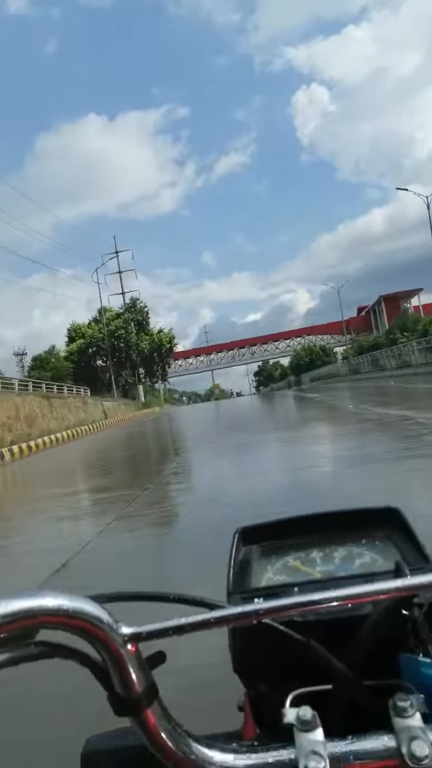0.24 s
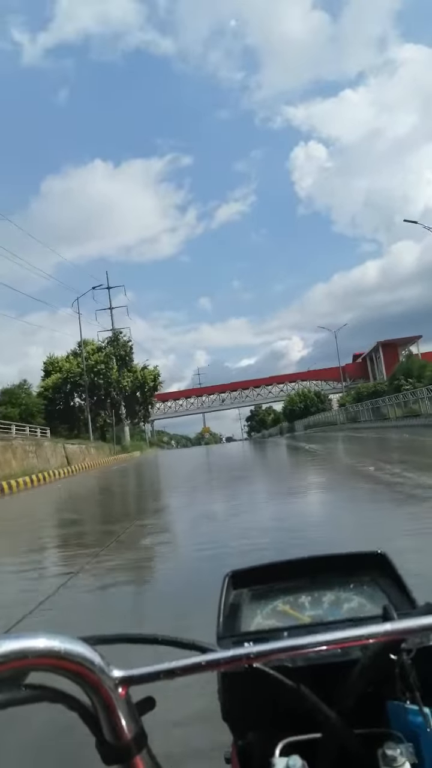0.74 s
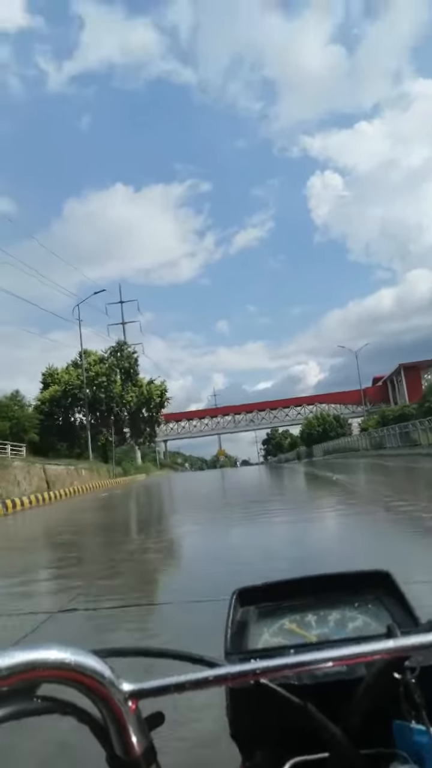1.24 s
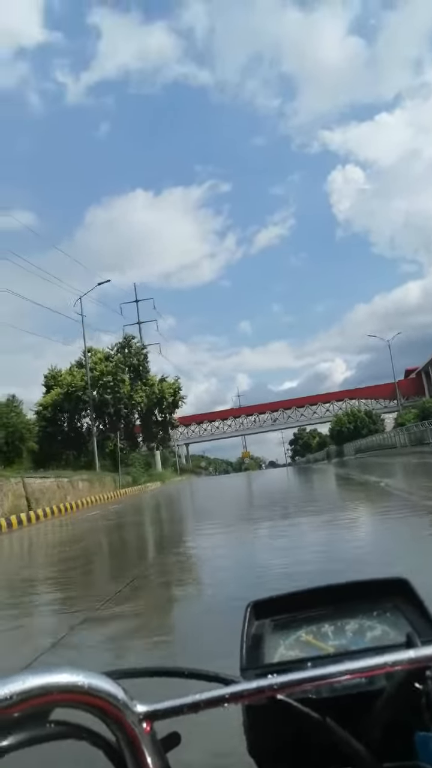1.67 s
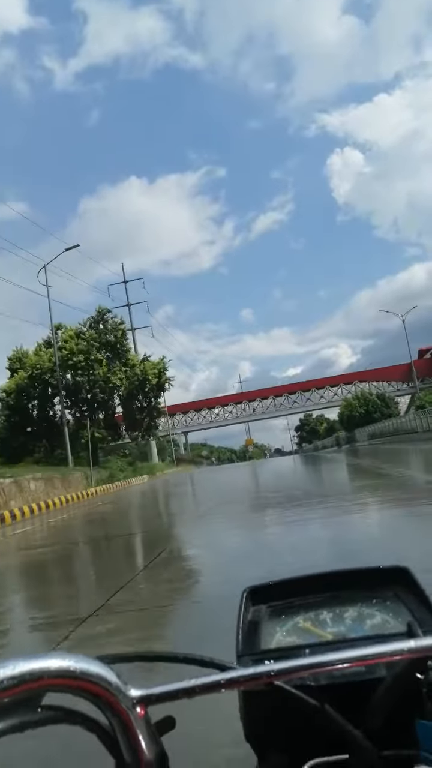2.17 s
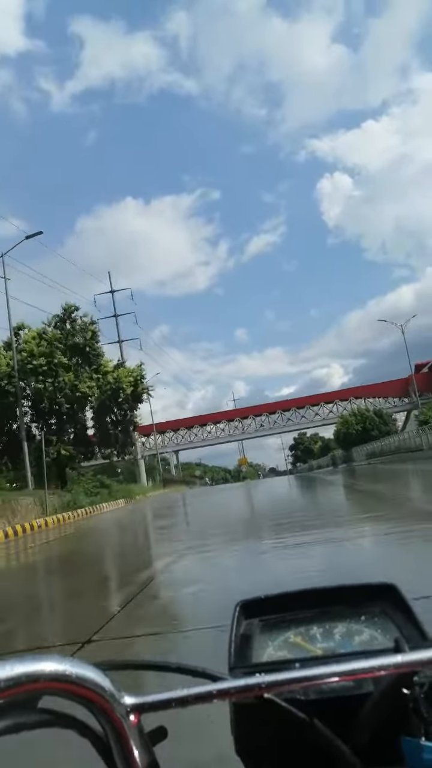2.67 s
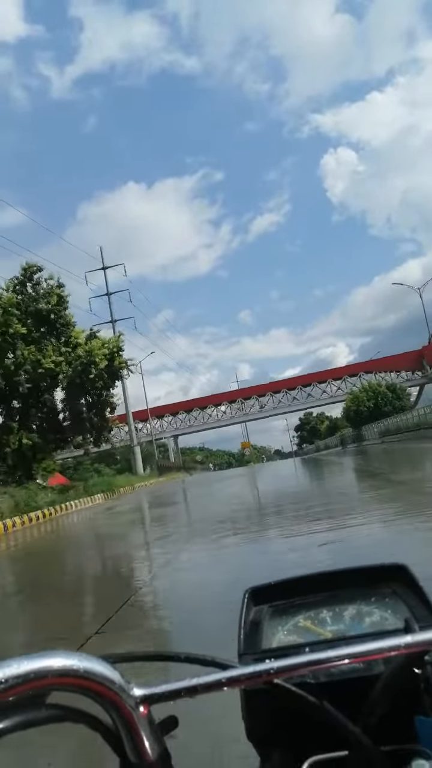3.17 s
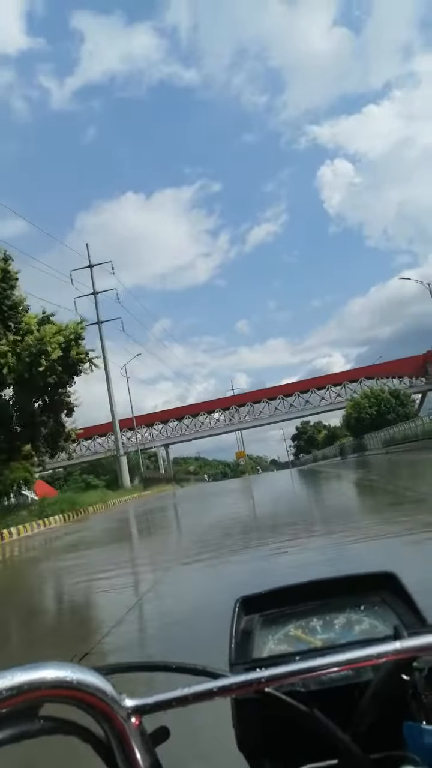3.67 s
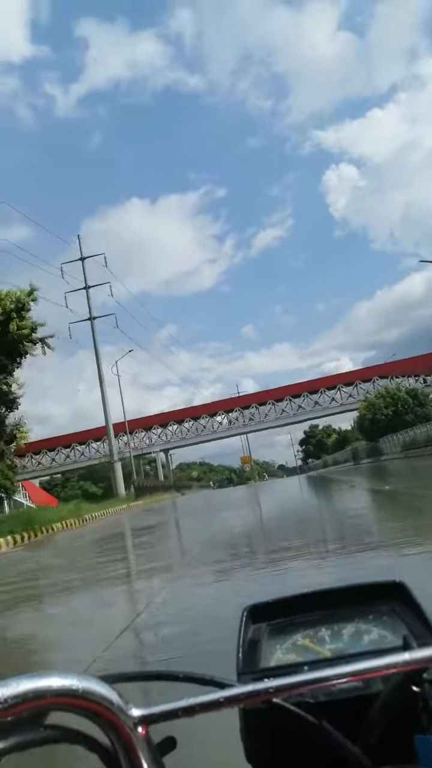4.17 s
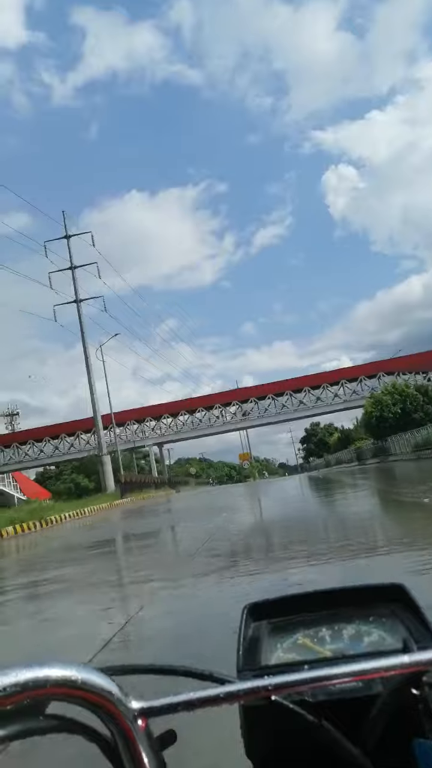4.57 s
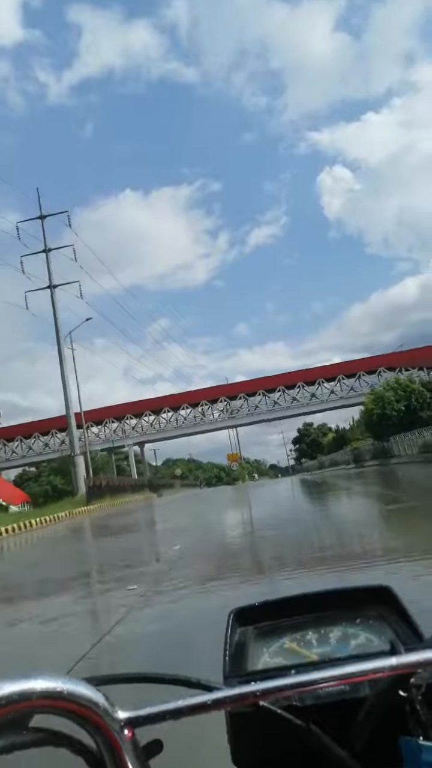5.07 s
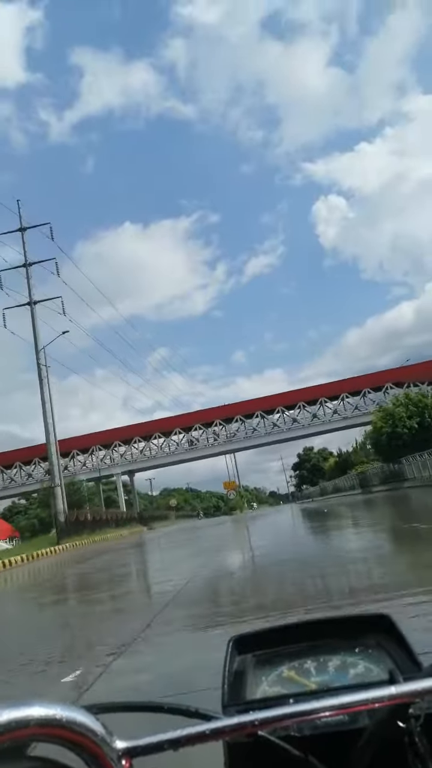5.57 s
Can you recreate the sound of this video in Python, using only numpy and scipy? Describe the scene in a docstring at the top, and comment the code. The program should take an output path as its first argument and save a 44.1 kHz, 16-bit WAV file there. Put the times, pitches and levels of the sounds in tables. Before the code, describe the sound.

Wind strikes the microphone in lumpy low bursts and sharp slaps while a small motorcycle engine putters quickly underneath, its pitch creeping up very slightly. Wet tyres add a continuous soft fizz and low roar, with a few tiny water ticks around one second. A calmer stretch near two seconds exposes the engine before heavier gusts follow. Outdoors, close mono microphone on the bike, its peaks held down automatically.

```python
"""A small single-cylinder engine drones and beats under the rider as a motorcycle cruises, very slowly speeding up.
The mono microphone is at the rider's seat: pulses shake pipe, case and valve gear over drone and gear whine.
The tyres roar low and hiss through the water film (shaped noise), and a few nearby drops tick (short sines).
Gusts on a breeze buffet the microphone (lumpy noise), and the sharpest eddies slap it (single swings).
The recorder eases the loud passages, limits the peaks and cuts the top of the band."""
import sys
import numpy as np
from scipy import signal
from scipy.fft import rfft, irfft, next_fast_len
from scipy.io import wavfile
from scipy.ndimage import uniform_filter1d, minimum_filter1d, map_coordinates

SR = 44100
rng = np.random.default_rng(int(sys.argv[2]) if len(sys.argv) > 2 else 0)


def int16_out(signal):
    """Quantize to a 16-bit WAV file."""
    q = np.round(np.clip(np.atleast_2d(signal).T, -1, 1) * 32767)
    wavfile.write(sys.argv[1], SR, q.astype(np.int16))


N = 256662  # length in samples

# All levels are ahead of the recorder; spectrum levels are relative, as each spectrum is scaled to rms 1.
# engine speed: [t/s, firing rate/Hz]
FIRING_RATE = [(0, 31.2), (.8, 31.25), (1.3, 31.35), (2.6, 31.38), (3.5, 31.48), (4.4, 31.62), (4.8, 31.8),
               (5.3, 32.05), (5.82, 32.15)]
# exhaust drone: [multiple of the firing rate, rms level/dB]
EXHAUST_DRONE = [(1, -59), (2, -37.5), (4, -44), (5, -40.5), (6, -50), (7, -52)]
# gear whine: [t/s, rms level/dB]
GEAR_WHINE = [(0, -54), (.7, -53.5), (2.6, -52), (3.4, -51), (4.4, -60), (5.82, -58.5)]
# outline of the pipe and air box: [f/Hz, relative level/dB]
PIPE_OUTLINE = [(150, -43.5), (250, -11), (282, -0.5), (315, 4), (346, 1), (378, -2), (410, 1.5), (442, 6),
                (472, -5.5), (503, -6), (535, -15.5), (565, -14), (597, -15.5), (680, -21.5), (790, -22.5),
                (1060, -23), (1300, -41)]
# crankcase resonances: [f/Hz, width of each of two equal stages/Hz, relative level/dB]
CASE_MODES = [(884.5, 110, -4), (824, 82, 0), (1024, 110, -4.5)]
# cylinder head resonances: [f/Hz, width of each of two equal stages/Hz, relative level/dB]
HEAD_MODES = [(1723, 310, -1.5), (1908, 120, 0), (2070, 180, -4.5), (2580, 460, -7.5), (3025, 130, 4.5),
              (3235, 130, 3.5)]
# valve gear: [t/s, level before a fixed 8 dB cut/dB]
VALVE_CLATTER = [(0, -45.5), (.17, -49.5), (.7, -45.5), (1.8, -45.5), (4.6, -46), (5.82, -49)]
# tyre hiss spectrum: [f/Hz, relative level per Hz/dB]
SPRAY_SPECTRUM = [(710, -32), (1200, -7), (1410, -19.5), (1500, -4.5), (1700, 0.5), (1900, -1),
                  (2240, -4.5), (2840, -3), (3130, -4.5), (3800, -10), (4430, -9), (5240, 2), (5930, 0.5),
                  (7130, -12), (7520, -20), (9780, -53.5)]
# hiss of the water film: [t/s, level before a random wobble/dB]
SPRAY_LEVEL = [(0, -50), (.4, -49), (.75, -47.5), (1.4, -48), (1.95, -47), (2.6, -48.5), (5.05, -48.5),
               (5.82, -50)]
# rolling noise spectrum: [f/Hz, relative level per Hz/dB]
ROAD_SPECTRUM = [(20, -16.5), (60, -9.5), (200, -4.5), (450, -4), (650, -12.5), (950, -10), (1350, -23.5),
                 (2500, -27.5), (5000, -57)]
# airflow between the gusts: [t/s, level before a random wobble/dB]
BREEZE = [(0, -35.5), (.65, -36.5), (1.1, -41), (1.35, -34.5), (1.9, -36), (2.8, -34), (3.3, -30.5),
          (4.15, -34.5), (4.45, -37.5), (5.0, -34.5), (5.82, -33)]
# gusts: [t at full strength/s, hold/s, buffet level/dB, flutter level/dB]
GUSTS = [(0.158, 0.019, -29.5, -35), (0.466, 0.033, -41, -38), (0.539, 0.031, -33, -42.5),
         (1.225, 0.075, -33.5, -38.5), (1.42, 0.098, -31.5, -48), (1.57, 0.051, -29, -42),
         (3.081, 0.023, -26, -33.5), (3.123, 0.1, -27.5, -42), (3.274, 0.034, -22.5, -33),
         (3.364, 0.18, -29, -42), (3.57, 0.022, -21.5, -32), (3.768, 0.1, -27, -50),
         (4.117, 0.24, -27.5, -40), (4.24, 0.055, -22.5, -30.5), (4.4, 0.026, -26.5, -35.5),
         (4.628, 0.024, -28.5, -33.5), (4.712, 0.3, -33, -42), (5.209, 0.048, -24, -45),
         (5.409, 0.024, -23.5, -32), (5.525, .027, -27.5, -35), (5.603, 0.11, -26, -47),
         (5.77, 0.02, -24, -37.5)]
# large eddies: [f/Hz, relative level per Hz/dB]
BUFFET_SPECTRUM = [(8, -30), (22, 0.5), (40, 3.5), (90, 1), (170, -2), (260, -4.5), (380, -13),
                   (550, -17.5), (1000, -55.5)]
# small eddies: [f/Hz, relative level per Hz/dB]
FLUTTER_SPECTRUM = [(100, -17), (250, -0.5), (420, 2.5), (620, -2.5), (850, -5.5), (1100, -19), (1400, -28),
                    (1900, -39), (3000, -63.5)]
# the smallest eddies: [f/Hz, relative level per Hz/dB]
TEARING_SPECTRUM = [(300, -23), (650, -1.5), (950, 0), (1300, -16), (1650, -18), (2400, -51.5)]
# the hardest eddies, large ones thump and small ones slap: [t/s, level of the swing before muffling/dB, f/Hz]
EDDY_SLAPS = [(.106, -14, 330), (0.115, -4.5, 190), (.149, -3, 450), (.157, -7.5, 520), (.159, -8, 168),
              (.172, -11, 290), (0.209, -8.5, 523), (.327, -8, 286), (.459, -19.5, 744), (0.49, -19, 260),
              (0.492, -24, 380), (.573, -16, 290), (1.232, -16, 82), (1.298, -18, 180), (1.476, -22, 537),
              (1.503, -17, 480), (1.508, -12, 365), (1.582, -24, 264), (1.585, -19.5, 780),
              (1.638, -19, 430), (1.724, -17, 127), (2.2, -12, 245), (2.488, -15, 202), (2.549, -9.5, 305),
              (2.974, -21, 520), (2.979, -9.5, 350), (3.017, -17, 380), (3.042, -16, 500),
              (3.085, -23.5, 190), (3.091, -23, 300), (3.104, -14.5, 200), (3.127, -12, 115),
              (3.149, -17, 183), (3.19, -11, 160), (3.23, -13, 105), (3.264, -16, 230), (3.286, -10.5, 171),
              (3.296, -12, 136), (3.316, -14.5, 170), (3.567, -16.5, 660), (3.578, -12.5, 290),
              (3.581, -20, 700), (3.614, -15, 140), (3.619, -17.5, 780), (3.845, -10, 280),
              (3.887, -12, 374), (4.129, -13.5, 85), (4.138, -15, 200), (4.183, -10.5, 272),
              (4.223, -14.5, 470), (4.233, -12.5, 139), (4.243, -11.5, 520), (4.261, -5, 627),
              (4.266, -7, 300), (4.27, -11.5, 127), (4.289, -11, 600), (4.293, -8, 700), (4.319, -1, 210),
              (4.325, -10.5, 524), (4.394, -14, 640), (4.409, -19, 560), (4.42, -4.5, 414),
              (4.591, -15.5, 140), (4.606, -9, 546), (4.632, -11.5, 233), (4.725, -16, 475),
              (5.079, -15.5, 130), (5.115, -18.5, 400), (5.199, -13, 135), (5.221, -15, 800),
              (5.23, -21, 720), (5.248, -12.5, 92.6), (5.426, -9.5, 258), (5.442, -18, 680),
              (5.521, -12, 293), (5.549, -13, 260), (5.583, -13.5, 567), (5.63, -19, 190),
              (5.658, -11.5, 220), (5.777, -6.5, 282), (5.813, -9.5, 395)]
# water drops: [t/s, peak level/dB, f/Hz, 60 dB decay time/s]
WATER_DROPS = [(.389, -28, 3600, .0008), (.795, -27, 5530, .0015), (1.0415, -19.5, 5800, 0.0029),
               (1.069, -25, 4200, 0.00067), (1.149, -27, 3500, .0008), (1.171, -24, 2840, 0.00098),
               (5.494, -28, 5400, 0.0016)]

BREEZE_FLUTTER_DB = -11.5  # small eddies of the breeze, against its large ones
GUST_ATTACK_S, GUST_RELEASE_S = 0.011, 0.02
TEARING_DB, TEARING_AT_DB = -39.5, -29  # tearing level at this flutter level; it grows with the flutter squared
TOP_HZ = 7500  # the recorder's band limit


def amp(db):
    """Decibels to gain."""
    return 10 ** (np.asarray(db) / 20)


def unit(x):
    """Scale to rms 1."""
    return x / np.sqrt(np.mean(x ** 2) + 1e-20)


def curves(rows):
    """One value per sample for each column after the time."""
    knots_s, *columns = np.transpose(rows)
    t = np.arange(N) / SR
    return [np.interp(t, knots_s, column) for column in columns]


def wobble(rate):
    """A smooth random curve, rate knots a second."""
    knots = rng.standard_normal(int(N * rate / SR) + 4)
    return map_coordinates(knots, [np.arange(N) * rate / SR])


def noise():
    """White noise."""
    return rng.standard_normal(N)


def filtered(x, response):
    """x times a complex response of frequency, with room for the tail."""
    size = 2 * next_fast_len(N // 2 + 8192)
    spectrum = rfft(x, size) * response(np.fft.rfftfreq(size, 1 / SR))
    return irfft(spectrum, size)[:N]


def coloured(x, points):
    """x through a causal filter with the given (Hz, dB) outline, at rms 1."""
    f, db = np.transpose(points)

    def response(hz):
        outline_db = np.interp(np.log(hz + 1), np.log(f), db)
        # folding the cepstrum onto positive times gives minimum phase
        cepstrum = irfft(np.log(amp(outline_db)))
        half = len(cepstrum) // 2
        return np.exp(rfft(2 * cepstrum[:half], len(cepstrum)))

    return unit(filtered(x, response))


def resonant(x, modes):
    """x through (Hz, width, dB) resonances, squared for steep skirts, at rms 1."""
    def response(f):
        total = 0
        for centre, width, db in modes:
            damping = 1j * f * width
            total = total + amp(db) * (damping / (centre * centre - f * f + damping)) ** 2
        return total

    return unit(filtered(x, response))


def tone(cycle, order, wander_db):
    """A slightly unsteady cosine at a multiple of the cycle rate, rms 1 before the wander."""
    return amp(wander_db * wobble(5.7)) * np.sqrt(2) * np.cos(2 * np.pi * round(order) * cycle)


def strokes(cycle, lag, scatter_db, jitter):
    """One impulse per engine cycle, lag cycles after the firing; jitter in seconds."""
    at = np.flatnonzero(np.diff(np.floor(cycle - lag)))
    chance = rng.standard_normal((len(at), 2))
    at = np.clip(np.round(at + jitter * SR * chance[:, 0]).astype(int), 0, N - 1)
    return np.bincount(at, amp(scatter_db * chance[:, 1]), N)


def engine(clatter_db):
    """Four gas pulses per cycle, a knock in the case and valve clatter, over the exhaust drone and a gear whine."""
    rate, = curves(FIRING_RATE)
    whine_db, = curves(GEAR_WHINE)
    cycle = np.cumsum(rate) / SR - .11
    drone = sum(amp(db) * tone(cycle, k, wander_db=0.9) for k, db in EXHAUST_DRONE)
    unsteady_cycle = cycle + 0.0022 * wobble(45)
    whine = amp(whine_db) * tone(unsteady_cycle, order=29, wander_db=1.5)

    # the exhaust blows, the intake sucks, the pipe puffs back twice: (share of a cycle, size)
    pulses = [(0, 1), (.3, -.55), (.6, .3), (.75, .2)]
    gas = sum(size * strokes(cycle, lag, scatter_db=1.2, jitter=.00004) for lag, size in pulses)
    bark = amp(-38.0) * coloured(gas, PIPE_OUTLINE)
    knock = strokes(cycle, .69, scatter_db=3.5, jitter=.00009)
    case = amp(-56.5) * resonant(knock, CASE_MODES)

    # the valve rattle swells twice per cycle, and one valve seats with a tick
    spells = amp(2 * np.cos(4 * np.pi * (cycle - .75)) + 3.1 * wobble(70))
    rattle = unit(spells * noise())
    seating = unit(strokes(cycle, .75, scatter_db=1.5, jitter=.00007))
    valves = amp(clatter_db - 8.0) * resonant(rattle + 0.71 * seating, HEAD_MODES)
    return drone + bark + case + whine + valves


def tyres(spray_db):
    """The tyres roll with a low roar and tear the water film into a fizz of droplets."""
    droplets = (rng.random(N) < 900 / SR) * noise()  # about 900 a second
    fizz = coloured(noise() + 0.66 * unit(droplets), SPRAY_SPECTRUM)
    hiss = amp(spray_db + 0.88 * wobble(28)) * fizz
    roar = amp(-44.0) * coloured(noise(), ROAD_SPECTRUM)
    return hiss + roar


def gust(start, hold):
    """A gust rises quickly to full strength at start, holds and dies away."""
    t = np.arange(N) / SR - start
    return np.interp(t, [-GUST_ATTACK_S, 0, hold, hold + GUST_RELEASE_S], [0, 1, 1, 0])


def turbulence(spectrum, lump_db, lump_rate):
    """Pressure noise that comes in brief lumps, at a steady mean strength."""
    x = coloured(noise() * amp(lump_db * wobble(lump_rate)), spectrum)
    mean_power = np.abs(uniform_filter1d(x ** 2, size=2400))  # over 54 ms
    return x / np.sqrt(mean_power + 1e-6)


def wind():
    """Gusts add their power to a restless breeze: large eddies rumble, small ones flutter, hard gusts tear."""
    breeze_db, = curves(BREEZE)
    breeze = amp(breeze_db + 1.5 * wobble(12))
    large_power = breeze ** 2
    small_power = (amp(BREEZE_FLUTTER_DB) * breeze) ** 2
    for start, hold, buffet_db, flutter_db in GUSTS:
        shape = gust(start, hold)
        large_power = large_power + (amp(buffet_db) * shape) ** 2
        small_power = small_power + (amp(flutter_db) * shape) ** 2
    buffet = np.sqrt(large_power) * turbulence(BUFFET_SPECTRUM, lump_db=1.5, lump_rate=45)
    flutter = np.sqrt(small_power) * turbulence(FLUTTER_SPECTRUM, lump_db=3.5, lump_rate=130)
    tearing_gain = amp(TEARING_DB) * small_power / amp(TEARING_AT_DB) ** 2
    tearing = tearing_gain * turbulence(TEARING_SPECTRUM, lump_db=13.5, lump_rate=160)
    return buffet + flutter + tearing


def swing(u, rise=0.25, fall=0.33):
    """One swing from suction to pressure; u, rise and fall in cycles."""
    return np.sin(2 * np.pi * u + 0.45) * np.exp(-np.maximum(-u / rise, u / fall))


def slaps(muffle_hz=1450, wake=0.36, wake_cycles=1.677):
    """A passing eddy is one quick swing, sharper when small; a weaker one of either sign spins off in its wake."""
    out = np.zeros(N + SR)
    t = np.arange(-2048, 2048) / SR
    chances = rng.uniform(-0.91, 1, (len(EDDY_SLAPS), 2))
    for (s, db, hz), (trail, delay) in zip(EDDY_SLAPS, chances):
        lag_cycles = wake_cycles * (1 + .4 * delay)
        follower = wake * np.sign(trail) * swing((t * hz - lag_cycles) * 0.97)
        out[round(s * SR) - len(t) // 2:][:len(t)] += amp(db) * (swing(t * hz) + follower)
    return filtered(out[:N], lambda hz: 1 / np.sqrt(1 + (hz / muffle_hz) ** 10))


def drops():
    """Each drop lands with a tick, a decaying sine: most are dry, a few ring slightly longer."""
    out = np.zeros(N + SR)
    t = np.arange(512) / SR
    for s, db, hz, ring in WATER_DROPS:
        envelope = amp(-60 * t / ring) * (1 - np.exp(-30 * t / ring))
        tick = np.sin(2 * np.pi * hz * t) * envelope
        out[round(s * SR):][:len(t)] += amp(db) * tick / np.abs(tick).max()
    return out[:N]


def scene():
    """Engine, wet tyres, drops and wind at one microphone."""
    spray_db, = curves(SPRAY_LEVEL)
    clatter_db, = curves(VALVE_CLATTER)
    return (engine(clatter_db) + tyres(spray_db) + drops() + wind() + slaps())[None]


def ducked(x, threshold_db, slope, recover_s):
    """Gain control turns everything down when the level passes the threshold and slowly recovers."""
    power = np.abs(uniform_filter1d(x ** 2, size=440))  # over 10 ms
    excess_db = np.maximum(10 * np.log10(power + 1e-12) - threshold_db, 0)
    keep = np.exp(-1 / (recover_s * SR))
    return x * amp(-slope * signal.lfilter([1 - keep], [1, -keep], excess_db))


def limited(x, ceiling_db):
    """A fast limiter ducks the whole sound for a few milliseconds around the biggest peaks."""
    needed = np.minimum(1, amp(ceiling_db) / (np.abs(x) + 1e-9))
    lowest = minimum_filter1d(needed, size=300)
    return x * uniform_filter1d(lowest, size=300)


def record(dry):
    """The recorder holds down the wind peaks and cuts steeply above its band limit."""
    eased = ducked(dry[0], threshold_db=-26.5, slope=1.0, recover_s=0.08)
    held = limited(eased, ceiling_db=-12.3)
    return filtered(held, lambda hz: 1 / (1 + np.minimum(hz / TOP_HZ, 2) ** 110))[None]


dry = scene()
out = record(dry)
int16_out(out)
```